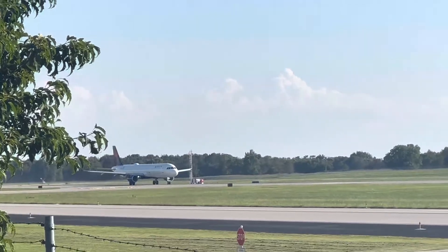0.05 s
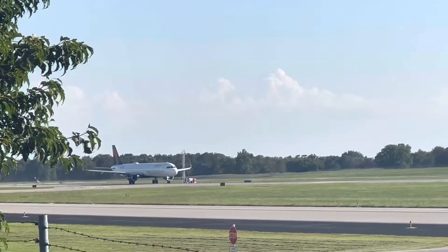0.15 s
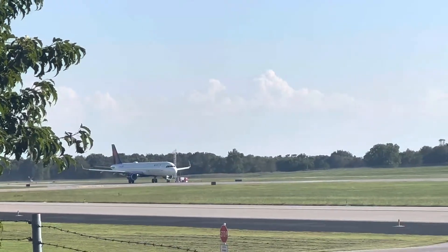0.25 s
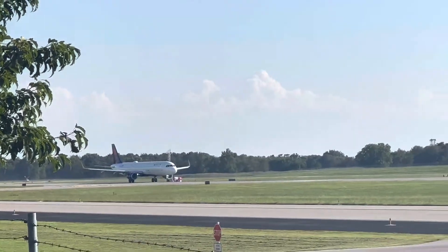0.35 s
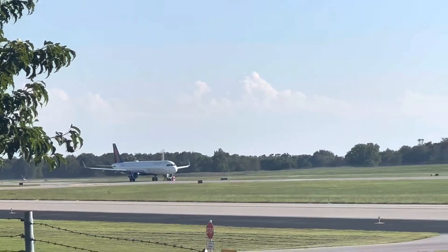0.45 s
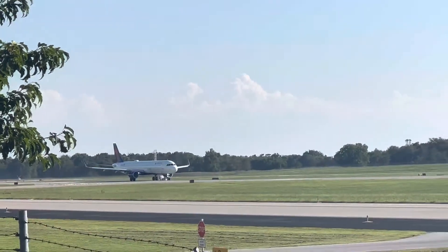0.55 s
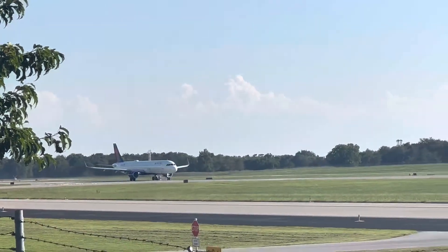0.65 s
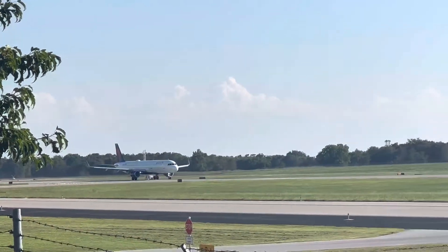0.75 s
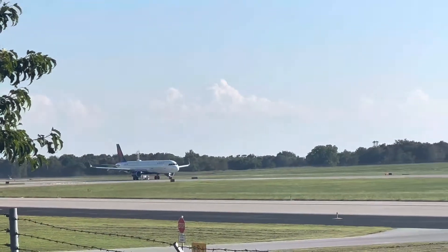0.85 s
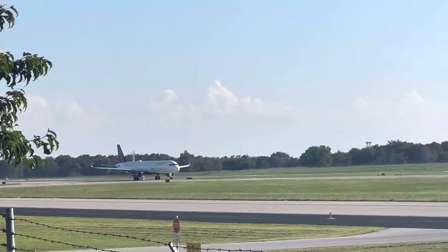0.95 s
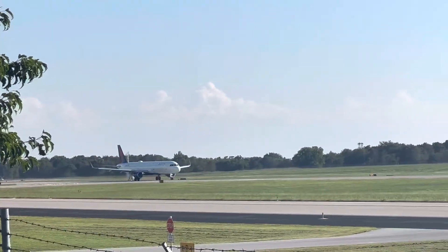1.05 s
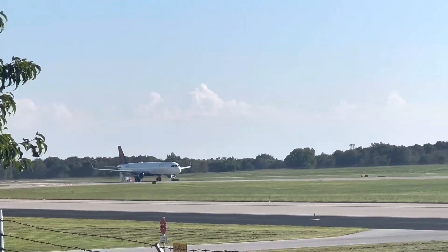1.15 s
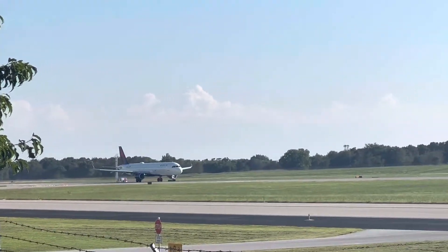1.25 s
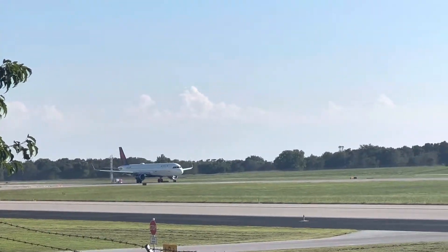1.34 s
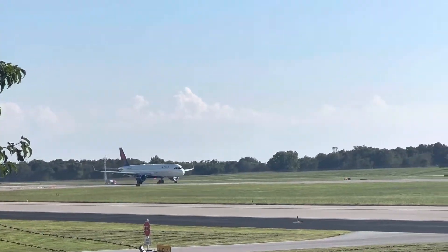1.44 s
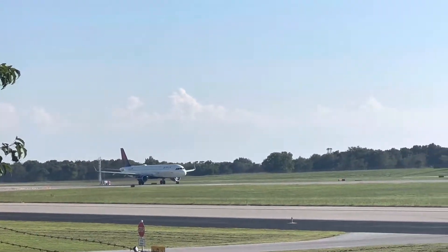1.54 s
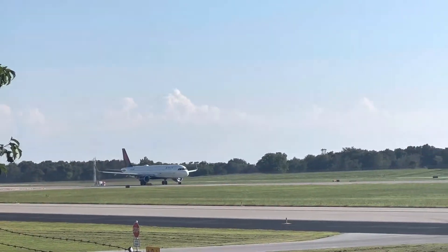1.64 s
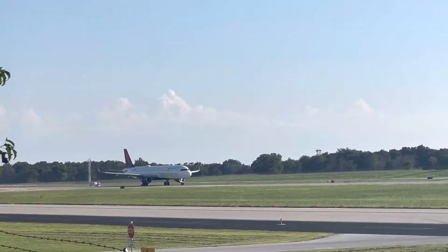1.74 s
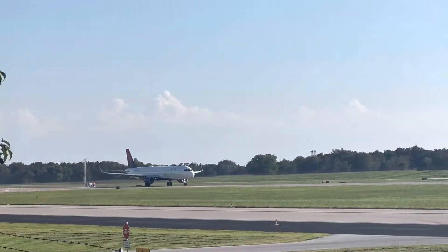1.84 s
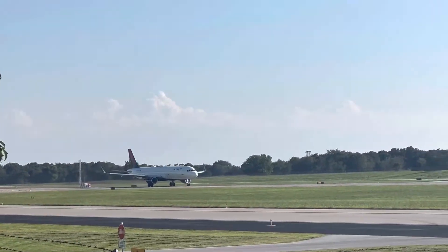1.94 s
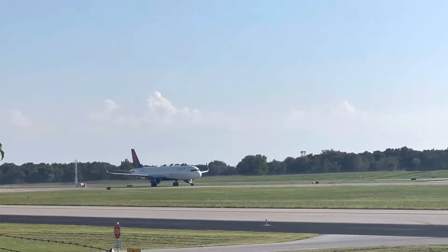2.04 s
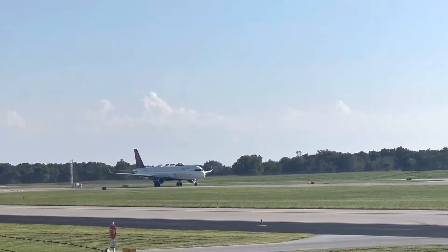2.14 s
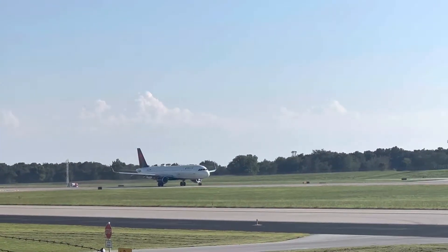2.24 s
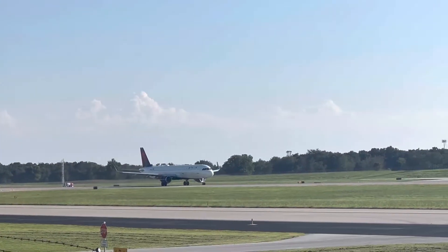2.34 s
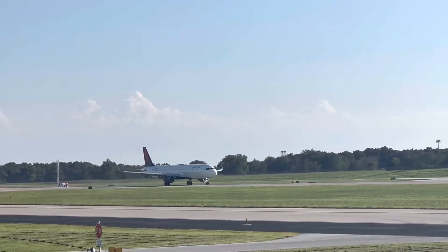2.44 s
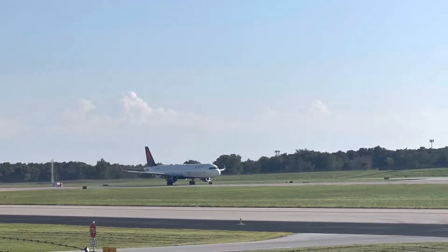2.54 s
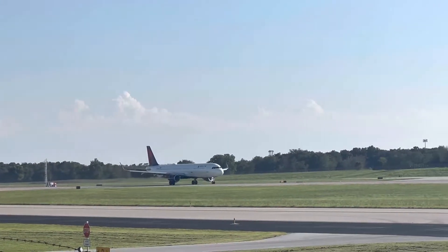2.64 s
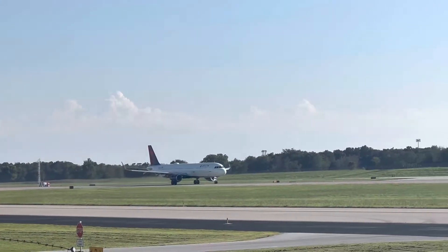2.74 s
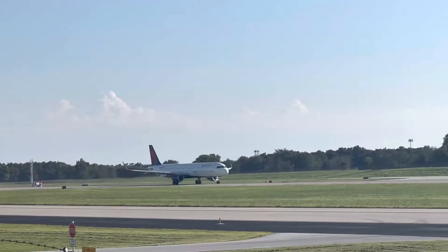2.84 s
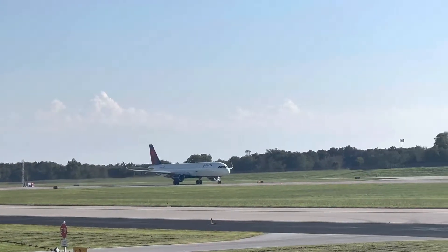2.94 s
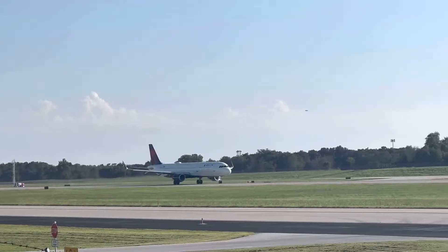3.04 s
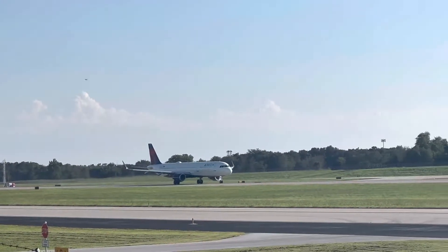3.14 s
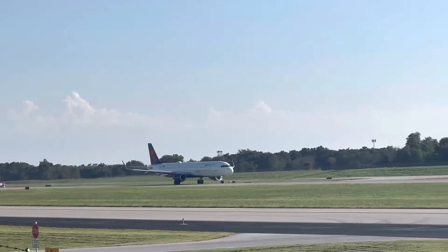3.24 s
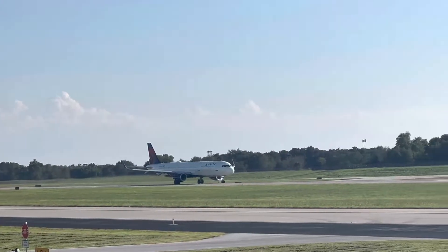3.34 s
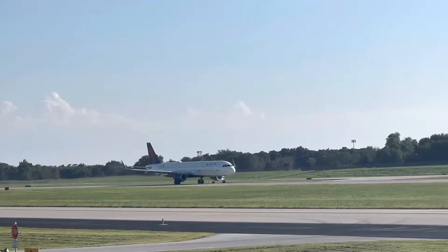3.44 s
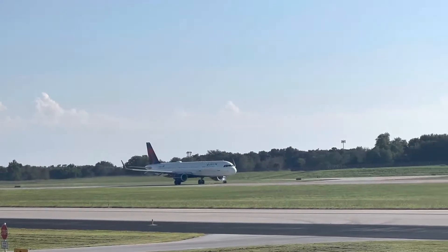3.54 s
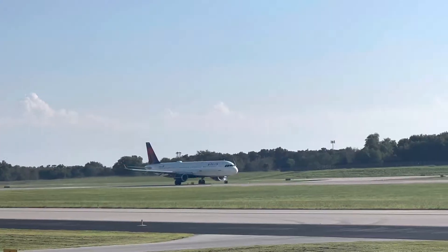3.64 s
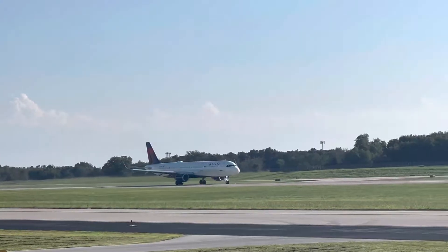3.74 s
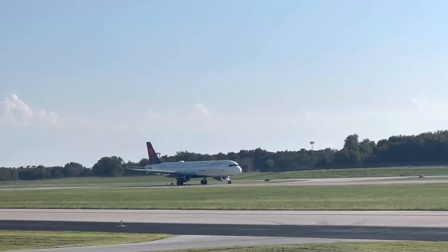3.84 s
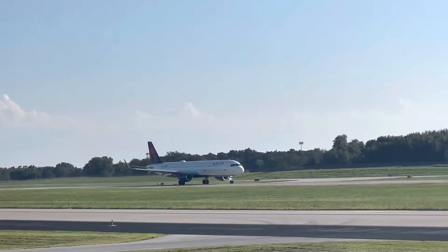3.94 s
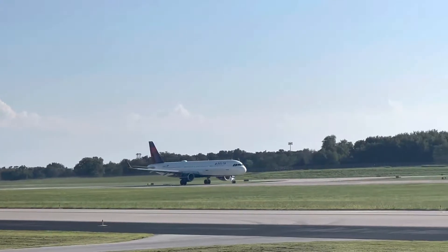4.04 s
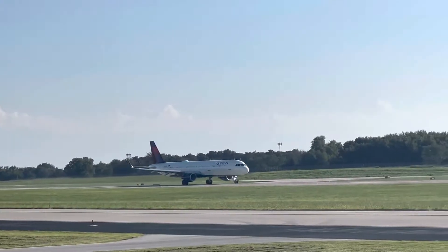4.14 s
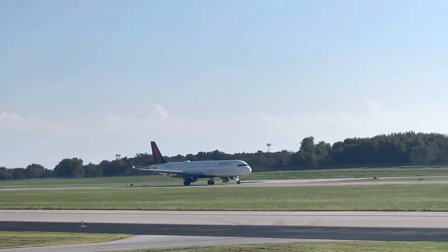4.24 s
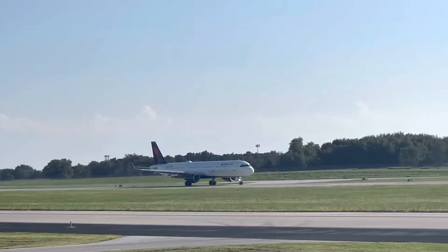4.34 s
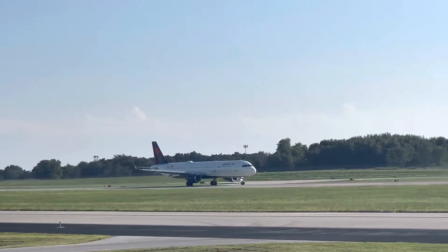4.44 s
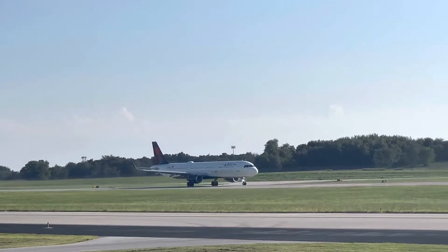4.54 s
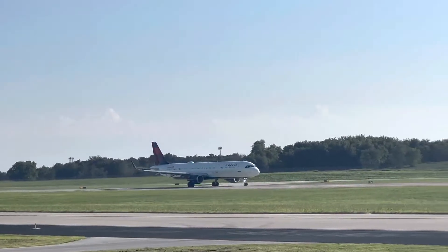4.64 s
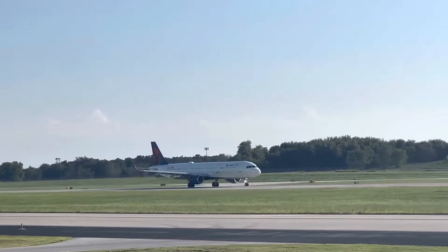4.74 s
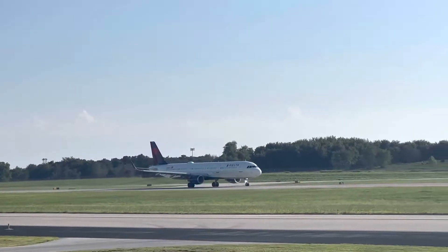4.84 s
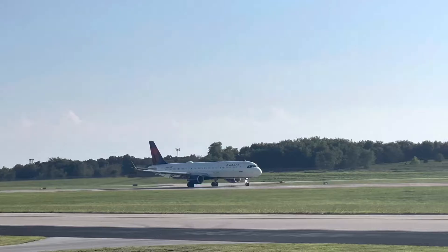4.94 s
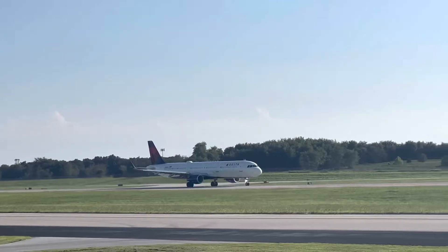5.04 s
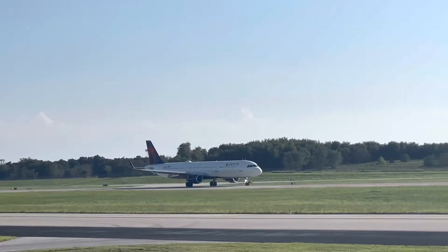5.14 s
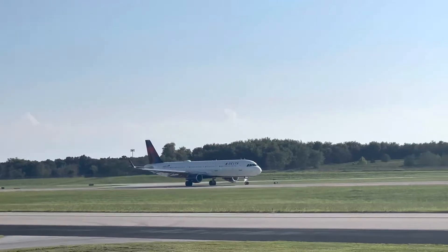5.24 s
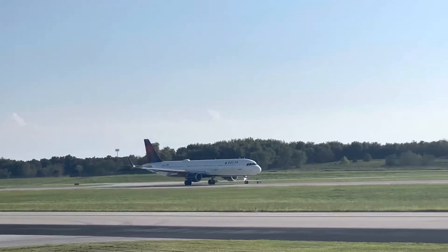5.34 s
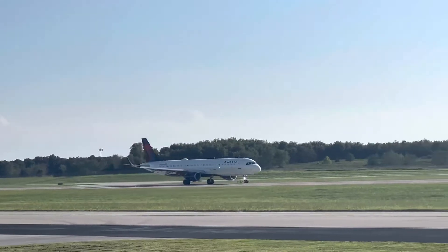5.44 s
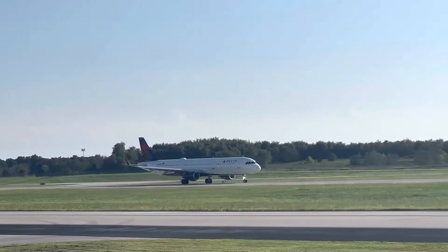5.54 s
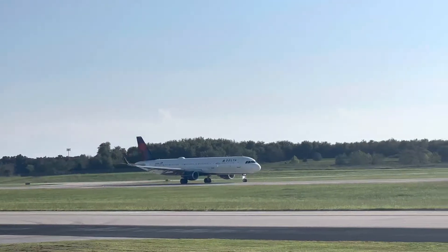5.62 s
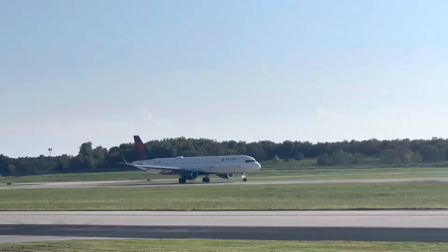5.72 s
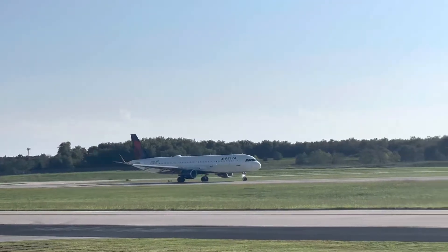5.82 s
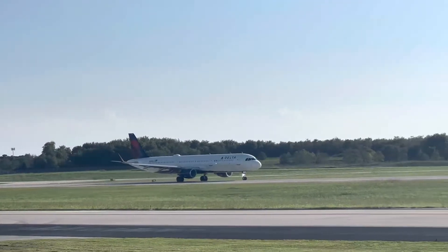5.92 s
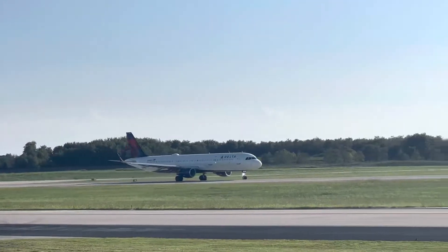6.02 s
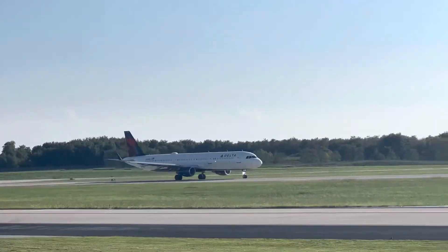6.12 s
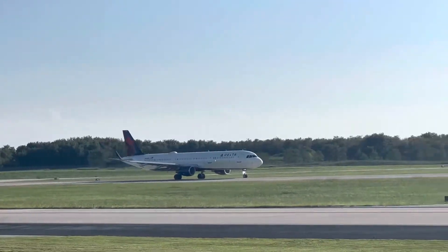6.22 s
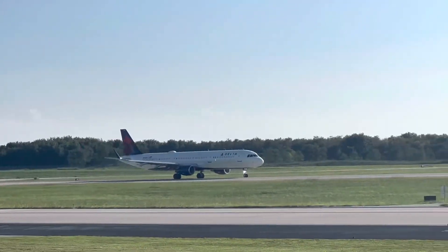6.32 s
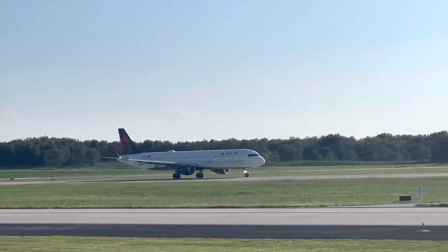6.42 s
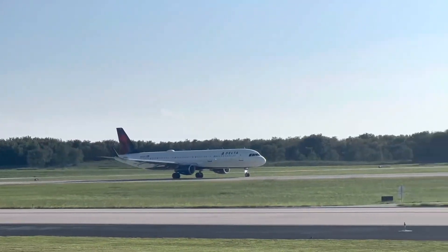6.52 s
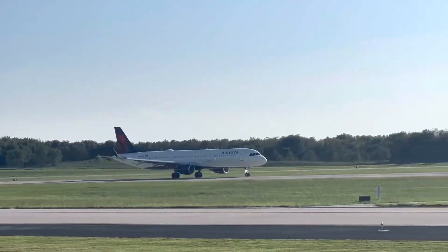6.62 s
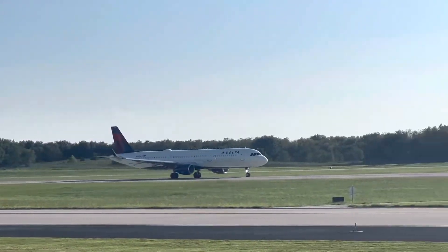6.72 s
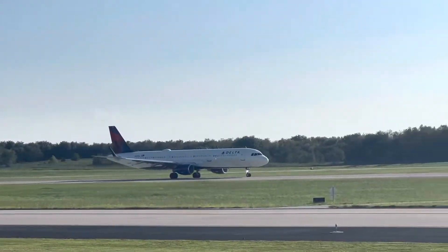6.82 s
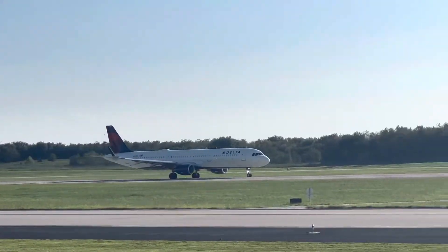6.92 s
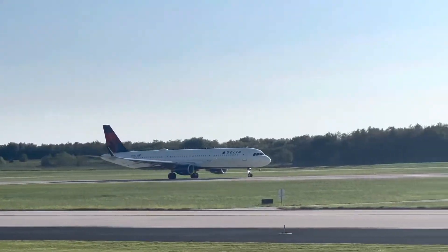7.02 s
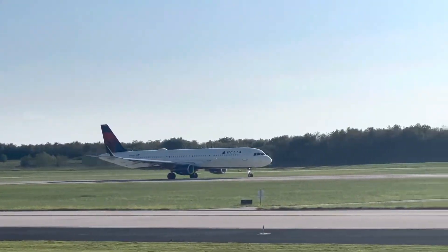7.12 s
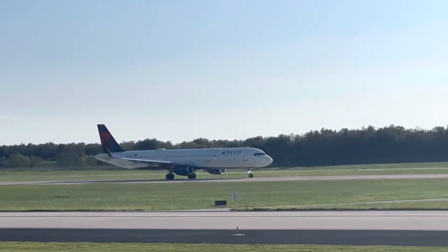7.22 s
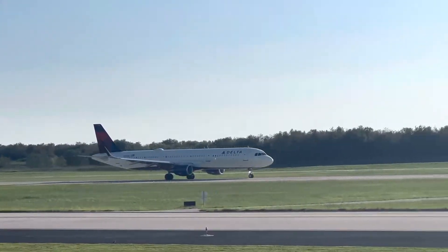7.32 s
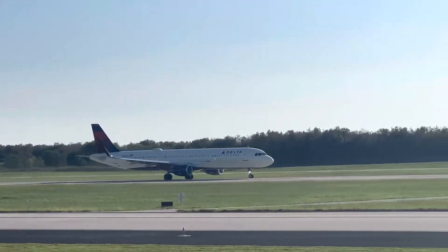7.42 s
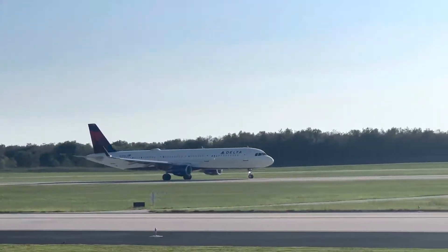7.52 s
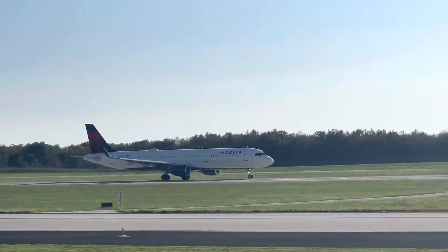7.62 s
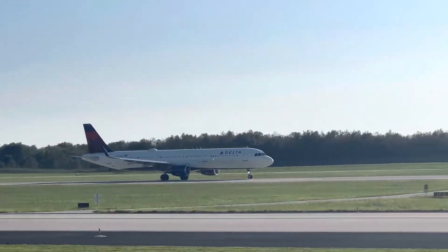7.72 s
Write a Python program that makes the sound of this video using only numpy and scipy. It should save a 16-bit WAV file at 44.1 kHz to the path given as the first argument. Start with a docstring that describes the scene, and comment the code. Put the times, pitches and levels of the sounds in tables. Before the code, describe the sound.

Open grass beside a runway, heard in stereo from far off. From 0 s a deep, uneven jet rumble flutters and surges beneath a muted roar, with a faint steady high whistle, thin meadow hiss and short insect chirrs that swell and stop abruptly. A tiny high tick falls near 1.9 s. The airliner's fan whine, around 3.4 kHz, flickers in and out, rising very slightly. Between 2.5 and 5 s the rumble thickens with hollow booms. At about 5.5 to 5.85 s short buzzy growls flare, and the roar gains a gliding hump. From 6.2 s everything climbs quickly; the whine becomes piercing from 6.6 to 6.9 s with broad bright hiss, its pitch beginning to sag. Rushing exhaust peaks around 7 s, with sparkling higher overtones, then whine and roar ease unevenly, still strong at the 7.8 s end.

```python
"""Jet takeoff seen from the fence

A twin-jet airliner rolls down a runway at takeoff thrust and draws level with the listener.
Exhaust is coloured noise in bands: rumble, boom, roar, rush, rasp. Fans are hiss plus blade and shaft
tones smeared by noise; the whine climbs, then sags as the aircraft goes by.
A thin whistle of fixed pitch, insect chirrs and one tick show while the aircraft is still far off."""
import sys
import numpy as np
from scipy import signal
from scipy.fft import rfft, irfft, next_fast_len
from scipy.io import wavfile
from scipy.ndimage import uniform_filter1d

SR = 44100
rng = np.random.default_rng(int(sys.argv[2]) if len(sys.argv) > 2 else 0)


def to_wav(s):
    """Save 16-bit WAV."""
    ch = np.atleast_2d(s).T  # columns
    pcm = np.round(np.clip(ch, -1, 1) * 32767)  # PCM
    wavfile.write(sys.argv[1], SR, pcm.astype(np.int16))


N = 342657
FRAME, HOP = 2048, 512  # samples
TIME = np.arange(N) / SR
FRAME_TIME = np.arange(N // HOP + 5) * HOP / SR
BIN_HZ = np.fft.rfftfreq(FRAME, 1 / SR)
BLADES = 36

# blade-passing tone as heard, spool-up and Doppler together: (time [s], frequency [Hz])
BLADE_PITCH = [(0, 3340), (1, 3362), (2, 3388), (3, 3406), (4, 3426), (5, 3435), (5.7, 3443), (6.15, 3424),
               (6.45, 3410), (6.88, 3412), (7.22, 3394), (7.36, 3380), (7.77, 3365)]
# blade-passing tone before gains: (time [s], level [dB])
WHINE_LEVEL = [(0, -58.5), (2.2, -57), (3.4, -55), (3.7, -49.5), (4.7, -51.5), (5.3, -46), (5.7, -39.5),
               (5.85, -47.5), (6.1, -40.5), (6.2, -36.5), (6.56, -31), (6.61, -21.5), (6.9, -20.5),
               (6.96, -33), (7.13, -31.5), (7.27, -33), (7.35, -28), (7.46, -28.5), (7.77, -35.5)]
# uneven fluttering of the low rumble: (time [s], level change [dB])
RUMBLE_FLUTTER = [(.15, -4), (.2, 2.5), (.43, -1.5), (1.07, 4.5), (1.18, -10.5), (1.31, 3.5), (2.25, -3),
                  (2.4, 2.5), (2.47, -9), (2.57, 2), (2.83, 4), (3.27, 3), (3.32, -5), (3.71, 1),
                  (4.08, -10), (4.81, -2.5), (4.96, 6.5), (5.32, 0.5), (5.55, -5.5), (5.7, 2.5),
                  (5.79, 4.5), (6.17, 3.5), (6.24, -7.5), (6.45, 6.5), (6.77, -6), (6.82, 4.5),
                  (7.24, -5.5), (7.29, 1)]
RUMBLE_FLUTTER_WIDTH_S = 0.019
# stereo width of the noise, wide in the upper mids, nearly mono around 5 kHz:
# (frequency [Hz], side level re mid [dB])
STEREO_WIDTH = [(60, -21.5), (130, -20), (210, -15.5), (370, -15), (600, -11), (920, -8.5), (1450, -8),
                (1900, -12), (2300, -23), (2700, -16), (3300, -13.5), (4200, -12.5), (5200, -32),
                (7000, -26), (9000, -10)]


def from_db(db):
    """Decibels to gain."""
    return 10 ** (np.asarray(db) / 20)


def unit(x):
    """Scales to an rms of one."""
    return x / np.sqrt(np.mean(abs(x) ** 2) + 1e-20)


def curve(rows, t, axis=1):
    """One column of a time table at the times t."""
    rows = np.asarray(rows)
    return np.interp(t, rows[:, 0], rows[:, axis])


def colour(points, hz=BIN_HZ):
    """A spectrum table read on a log-frequency axis."""
    f, value = np.transpose(points)
    return np.interp(np.log(hz + 1), np.log(f + 1), value)


def lobe(t, at, width):
    """A smooth bump of height one."""
    return np.exp(-((t - at) / width) ** 2)


def swings(rows, width_s):
    """Brief rises and dips of level in dB, one for each row."""
    return sum(db * lobe(TIME, at_s, width_s) for at_s, db in rows)


def surges(rate_hz):
    """Uneven random swings of rms one, at about the given rate."""
    size = next_fast_len(N)
    ratio = np.fft.rfftfreq(size, 1 / SR) / rate_hz
    band = ratio ** 2 / (1 + ratio ** 2) ** 3
    return unit(irfft(rfft(rng.standard_normal(size)) * band, size)[:N])


def flutter(width_hz):
    """Complex noise of the given width: what turbulent air does to a pure tone."""
    hz = np.fft.fftfreq(next_fast_len(N), 1 / SR)
    z = rng.standard_normal(len(hz)) + 1j * rng.standard_normal(len(hz))
    return unit(np.fft.ifft(z / (1 + (2 * hz / width_hz) ** 2))[:N])


def steadied(x, size):
    """Takes out swells slower than size samples and keeps the quick churning."""
    power = np.atleast_2d(abs(x) ** 2).mean(0)
    smooth_power = uniform_filter1d(uniform_filter1d(power, size=size), size=size)
    return x / np.sqrt(smooth_power + 1e-12)


def ports(hz):
    """Complex gains of the left and right microphone port: level and phase differ with frequency."""
    # phase by which left leads: (frequency [Hz], phase [rad])
    left_lead = [(60, 0), (200, .1), (430, .35), (780, .85), (1290, .55), (1680, -1.0), (2150, -.2),
                 (3100, .75), (3500, .5), (4600, 0)]
    # left minus right: (frequency [Hz], level difference [dB])
    left_balance = [(150, 0), (450, 1.3), (800, 3.5), (1100, 6.3), (1600, 8.8), (1800, 3), (2200, -.4),
                    (2750, -1.6), (3400, -.2), (4500, 0)]
    half = from_db(colour(left_balance, hz) / 2) * np.exp(.5j * colour(left_lead, hz))
    pair = np.array([half, 1 / half])
    return pair / abs(pair.mean(0))


def turbulence(spectrum, level_db, patchy_db, tilt_db=0):
    """Stereo noise of a given colour and level; eddies on the path make patches of it swell and fade."""
    a, b, c, d, patches = rng.standard_normal((5, len(FRAME_TIME), len(BIN_HZ)))
    patches = uniform_filter1d(patches, size=16, axis=0)
    patches = unit(uniform_filter1d(patches, size=9, axis=1))
    mid = a + 1j * b
    side = from_db(colour(STEREO_WIDTH)) * (c + 1j * d)
    z = np.array([mid + side, mid - side]) * ports(BIN_HZ)[:, None]
    z *= unit(from_db(colour(spectrum)))
    z *= from_db(level_db[:, None] + patchy_db * patches + tilt_db)
    sound = signal.istft(z.transpose(0, 2, 1), nperseg=FRAME, noverlap=FRAME - HOP)[1]
    return sound[:, :N] * np.sqrt(3 / FRAME)


def tone(hz, envelope):
    """A tone on the pitch curve hz, as the two ports hear it."""
    carrier = np.exp(2j * np.pi * np.cumsum(hz) / SR)
    return np.sqrt(2) * (ports(hz) * envelope * carrier).real


def nearness(t):
    """Engine level relative to its loudest, in dB (zero or below), as the aircraft draws level."""
    # engines on approach, only relative level counts: (time [s], level [dB])
    engine_loudness = [(0, -49.5), (1.3, -46.5), (1.8, -47), (3.4, -45), (4.05, -42.5), (4.9, -43),
                       (5.5, -37), (6.28, -36.5), (6.76, -26), (7.1, -25.5), (7.45, -29.0), (7.77, -29.5)]
    return curve(engine_loudness, t) - max(db for _, db in engine_loudness)


def follow(law, t):
    """The level in dB of a layer that follows the engines."""
    loudest_db, slope = law
    return loudest_db + slope * nearness(t)


def fan_beam():
    """Sideways beam of fan tones from the intakes, sweeping over the listener once; height one."""
    return lobe(TIME, at=6.72, width=0.15)


def insects():
    """Single chirrs swell and break off over the faint, patchy high hiss of the meadow."""
    # meadow hiss: (frequency [Hz], relative density [dB])
    meadow_colour = [(3000, -20.5), (4500, -8), (5150, 5.5), (5700, 6.5), (6200, -12), (6900, -22),
                     (7500, -3), (8400, -1.5), (8900, -11.5), (9400, -6), (10200, -19.5)]
    # chirrs: (start [s], end [s], frequency [Hz], level at the end [dB])
    chirrs = [(-.3, 0.243, 7520, -65.5), (.3, .56, 7950, -72), (.8, 1.305, 7540, -63.5),
              (1.85, 2.118, 7980, -70), (2.398, 2.9, 7540, -65), (3.303, 3.803, 7540, -64),
              (4.25, 4.55, 7950, -72), (4.55, 4.97, 7500, -66), (5.5, 5.96, 7560, -64.5)]
    sound = turbulence(meadow_colour, np.full(len(FRAME_TIME), -67.), patchy_db=3.0)
    scrape = flutter(width_hz=200)
    for start_s, end_s, hz, db in chirrs:
        swell = np.interp(TIME, [start_s, end_s - .02, end_s], [0, 1, 0]) ** 1.2
        chirr = (scrape * np.exp(2j * np.pi * hz * TIME)).real
        sound += np.sqrt(2) * from_db(db) * swell * chirr
    return sound


def tick():
    """One tiny high tick close by: a decaying burst of narrow noise."""
    age_s = TIME - 1.879
    decay = (age_s > 0) * np.exp(-abs(age_s) / 0.0037)
    return tone(np.full(N, 7900.), from_db(-54) * decay * flutter(width_hz=1500))


def whistle():
    """A thin tone of fixed pitch in a faint sizzle; it sinks under the approaching jets."""
    # whistle before gain: (time [s], level [dB])
    whistle_level = [(0, -69), (.16, -68), (.25, -80), (.55, -72), (.8, -71), (1.08, -79), (1.21, -61),
                     (1.44, -65), (1.53, -70), (1.74, -60.5), (1.95, -59), (2.2, -61.5), (2.9, -55),
                     (3.3, -61), (3.95, -57), (4.6, -61.5), (4.9, -71), (5.35, -64.5)]
    pitch_hz, gain_db, sink_db_per_s = 5551., 3, 9
    sinking_db = -sink_db_per_s * np.maximum(TIME - whistle_level[-1][0], 0)
    strength = from_db(curve(whistle_level, TIME) + gain_db + sinking_db)
    waver = unit(1 + 0.26 * flutter(width_hz=24))
    sizzle = 0.36 * flutter(width_hz=860)
    return tone(np.full(N, pitch_hz), strength * (waver + sizzle))


def growls():
    """A few neighbouring shaft tones flare together and beat at the shaft speed: short buzzy bursts."""
    # bursts: (time [s], half length [s], centre frequency [Hz], level [dB])
    growl_bursts = [(5.503, 0.036, 1200, -41), (5.73, 0.043, 1190, -35), (5.827, .03, 1120, -39.5)]
    width_hz = 146
    shaft_hz = curve(BLADE_PITCH, TIME) / BLADES
    sound = 0
    for order in range(10, 16):
        hz = order * shaft_hz
        bursts = 0
        for at_s, half_s, centre_hz, db in growl_bursts:
            bursts = bursts + from_db(db) * lobe(TIME, at_s, half_s) * lobe(hz, centre_hz, width_hz)
        sound = sound + tone(hz, bursts * steadied(flutter(width_hz=82), size=1800))
    return sound


def fan_hiss():
    """Broad fan noise; the air swallows less of its treble as the aircraft nears."""
    # hiss: (frequency [Hz], relative density [dB])
    hiss_colour = [(700, -30.5), (1400, -3), (1900, -1.5), (2700, 2), (3200, -0.5), (3600, -2.5),
                   (4100, -7), (5000, -8), (5900, -16), (6900, -19), (7700, -27.5), (8600, -33.5),
                   (9100, -51), (9700, -64)]
    # (level at loudest engines [dB], slope [dB per dB of engine level])
    hiss_law = (-26, 0.88)
    # treble tilt: (tilt at loudest engines [dB], slope [dB per dB of engine level])
    clearness_law = (.2, 0.4)
    # (frequency [Hz], weight of the tilt)
    absorption = colour([(1900, 0), (2600, 0.32), (3500, 0.59), (4500, 1.0), (6500, 1.0), (9000, 2.0)])
    tilt_db = follow(clearness_law, FRAME_TIME)[:, None] * absorption
    return turbulence(hiss_colour, follow(hiss_law, FRAME_TIME), patchy_db=1.47, tilt_db=tilt_db)


def shaft_tones():
    """Unevenly matched fan blades sound weak tones at multiples of the shaft speed."""
    # multiples of shaft speed
    shaft_orders = [7, 14, 20, 22, 24, 26, 33, 35, 39, 46]
    # level of each multiple, re the common level [dB]
    shaft_levels = [-13, -20, -15, -13.5, -17.5, -22.5, -16.5, -11, -23.5, -26]
    # common level: (level at loudest engines, outside the beam [dB], slope [dB per dB of engine level])
    shaft_law = (-30.5, 1.13)
    beam_db = 9
    hz = curve(BLADE_PITCH, TIME)
    common_db = follow(shaft_law, TIME) + beam_db * fan_beam()
    sound = 0
    for order, db in zip(shaft_orders, shaft_levels):
        sound = sound + tone(hz * order / BLADES, from_db(common_db + db) * flutter(width_hz=21))
    return sound


def far_fan():
    """The far engine's fan runs a shade slower and beats against the near one."""
    slower_hz, gain_db = 34, -11
    strength = from_db(curve(WHINE_LEVEL, TIME) + gain_db) * (1 - fan_beam())
    return tone(curve(BLADE_PITCH, TIME) - slower_hz, strength * flutter(width_hz=34))


def whine_octave():
    """Octave of the blade-passing tone, twinkling in bright beads as the aircraft goes by."""
    # octave before beads: (time [s], level [dB])
    octave_level = [(0, -92), (5.3, -76), (6.35, -63), (6.55, -57), (6.61, -49.5), (7.17, -54), (7.3, -54),
                    (7.77, -62)]
    # beads: (time [s], level rise [dB])
    octave_beads = [(6.615, 7), (6.755, 8), (6.845, 7), (6.98, 5.5), (7.02, 5), (7.065, 9), (7.145, 14),
                    (7.25, 9), (7.57, 12)]
    level_db = curve(octave_level, TIME) + swings(octave_beads, width_s=0.027)
    return tone(2 * curve(BLADE_PITCH, TIME), from_db(level_db) * steadied(flutter(width_hz=44), size=1700))


def fan_whine():
    """The blade-passing tone, smeared by the air into a core and a skirt."""
    # moving air carries the whine over more strongly or bends it away: (time [s], level change [dB])
    air_flares = [(.51, 10.5), (.73, 8), (1.15, 8), (1.97, 7), (2.38, 11), (2.7, 11), (2.78, 11), (3.1, 12),
                  (3.95, 5), (4.0, -9), (4.05, 3.5), (4.28, 3), (4.56, 1), (4.92, 4), (5.3, 6), (5.76, 5),
                  (5.82, 0), (5.96, 9.5), (6.12, -7), (6.48, 3.5), (6.79, -10), (6.85, 2.5), (6.99, 10),
                  (7.11, 9.5), (7.23, 7.5), (7.28, -10), (7.52, -10)]
    gain_db, fading_db = .9, 1.1
    # over a long path mostly scattered, fading in and out; close by and in the beam it holds
    far_share, near_share, beam_share = .09, .42, .4
    direct = far_share + near_share * from_db(nearness(TIME)) + beam_share * fan_beam()
    direct = np.clip(direct, 0, 1)
    scattered = unit(flutter(width_hz=29) + 0.89 * flutter(width_hz=38))
    wandering = np.exp(1j * flutter(width_hz=16).real)
    core = steadied(np.sqrt(direct) * wandering + np.sqrt(1 - direct) * scattered, size=4200)
    core = (1 - direct) * core + direct * steadied(core, size=1300)
    fades_db = fading_db * np.sqrt(1 - direct) * surges(rate_hz=7.3)
    level_db = curve(WHINE_LEVEL, TIME) + gain_db + fades_db + swings(air_flares, width_s=0.023)
    return tone(curve(BLADE_PITCH, TIME), from_db(level_db) * core)


def rasp():
    """The smallest exhaust eddies, nearest the nozzles, swelling with the engines."""
    # rasp: (frequency [Hz], relative density [dB])
    rasp_colour = [(600, -27), (950, -14), (1100, 2.5), (1300, 0), (1550, -5.5), (2200, -11), (4500, -61)]
    # (level at loudest engines [dB], slope [dB per dB of engine level])
    rasp_law = (-29.5, 0.89)
    return turbulence(rasp_colour, follow(rasp_law, FRAME_TIME), patchy_db=1.2)


def rush():
    """Noise the jets throw aft; it sweeps over the listener just after the fan tones."""
    # rush: (frequency [Hz], relative density [dB])
    rush_colour = [(300, -34.5), (500, -1.5), (620, -0.5), (830, -1), (1000, -3.5), (1250, -24.5),
                   (2500, -64.5)]
    # (time [s], level [dB])
    rush_level = [(0, -43.5), (4.8, -41.5), (5.7, -39), (6.25, -36.5), (6.55, -30.5), (6.76, -26.5),
                  (7.0, -23.5), (7.17, -30.5), (7.3, -28), (7.52, -33), (7.7, -28.5)]
    return turbulence(rush_colour, curve(rush_level, FRAME_TIME), patchy_db=0.87)


def roar():
    """Mid-sized exhaust eddies, with a spectral hump that comes and goes as it glides."""
    # roar: (frequency [Hz], relative density [dB])
    roar_colour = [(140, -25), (240, -3.5), (330, 2.5), (420, 2.5), (510, -1), (600, -3), (720, -24.5),
                   (1500, -66)]
    # before the hump: (time [s], level [dB])
    roar_level = [(0, -40.5), (.35, -40.5), (.7, -38.5), (1.45, -37), (2.0, -41), (3.2, -41), (4.1, -38.5),
                  (4.55, -38.5), (5.27, -37), (5.5, -34), (5.95, -34), (6.2, -34), (6.75, -27.5),
                  (7.02, -26.5), (7.2, -30.5), (7.5, -32.5), (7.77, -29.5)]
    # hump: (time [s], centre frequency [Hz], height [dB])
    roar_hump = [(3.6, 410, -0.5), (4.3, 420, 4.5), (5.0, 400, -0.5), (5.45, 300, 1), (5.62, 298, 9),
                 (5.8, 357, 3.5), (5.97, 385, 4.5), (6.1, 340, 1.5), (6.4, 332, 1), (6.7, 402, 2)]
    hump_width_hz = 65
    frames = FRAME_TIME[:, None]
    hump_shape = lobe(BIN_HZ, curve(roar_hump, frames), hump_width_hz)
    hump_db = curve(roar_hump, frames, axis=2) * hump_shape
    return turbulence(roar_colour, curve(roar_level, FRAME_TIME), patchy_db=0.5, tilt_db=hump_db)


def boom():
    """Hollow top of the rumble, sharing its uneven fluttering."""
    # boom: (frequency [Hz], relative density [dB])
    boom_colour = [(120, -24), (165, 5.5), (195, 1), (230, -6), (280, -7), (360, -26), (600, -61)]
    # before fluttering: (time [s], level [dB])
    boom_level = [(0, -40.5), (2.35, -41.5), (2.57, -31.5), (2.85, -38.5), (3.15, -47), (3.8, -33),
                  (4.78, -36.5), (4.98, -32), (5.35, -35), (5.55, -33), (5.9, -33), (6.1, -29.5),
                  (6.35, -28), (6.7, -44), (7.77, -39)]
    churn = steadied(turbulence(boom_colour, np.zeros(len(FRAME_TIME)), patchy_db=0), size=3500)
    return churn * from_db(curve(boom_level, TIME) + swings(RUMBLE_FLUTTER, RUMBLE_FLUTTER_WIDTH_S))


def rumble():
    """The largest eddies, far down the jets, beat the air in uneven surges."""
    # rumble: (frequency [Hz], relative density [dB])
    rumble_colour = [(14, -56.5), (25, -31.5), (42, -8.5), (62, -0.5), (105, 1.5), (130, -2.5), (165, -8),
                     (205, -21), (290, -30), (600, -75.5)]
    # before gain, surges and fluttering: (time [s], level [dB])
    rumble_level = [(0, -24.5), (1.7, -21), (2.05, -22.5), (2.5, -22.5), (2.85, -19.5), (3.15, -21.5),
                    (3.8, -18), (4.4, -18), (4.78, -21.5), (5.0, -17.5), (5.4, -17), (6.0, -18),
                    (7.77, -18.5)]
    gain_db, surge_db = .3, .9
    hz = np.fft.rfftfreq(N, 1 / SR)
    mid, side = rfft(rng.standard_normal((2, N))) * from_db(colour(rumble_colour, hz))
    side = side * from_db(colour(STEREO_WIDTH, hz))
    churn = steadied(irfft(np.array([mid + side, mid - side]), N), size=2800)
    uneven_db = surge_db * surges(rate_hz=7) + swings(RUMBLE_FLUTTER, RUMBLE_FLUTTER_WIDTH_S)
    return churn * from_db(curve(rumble_level, TIME) + gain_db + uneven_db)


def scene():
    """The aircraft across open grass."""
    surroundings = insects() + tick() + whistle()
    fans = growls() + fan_hiss() + shaft_tones() + far_fan() + whine_octave() + fan_whine()
    exhaust = rasp() + rush() + roar() + boom() + rumble()
    return surroundings + fans + exhaust


def record(dry):
    """Band limit: a linear-phase low-pass."""
    cutoff_hz = 9700
    lowpass = signal.firwin(511, cutoff_hz, window=("kaiser", 9), fs=SR)
    return signal.oaconvolve(dry, lowpass[None], "same")


dry = scene()
out = record(dry)
to_wav(out)
```